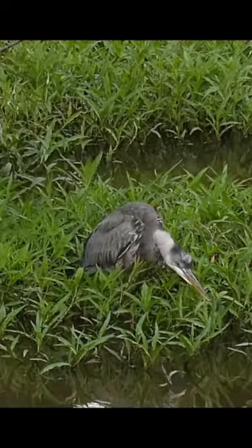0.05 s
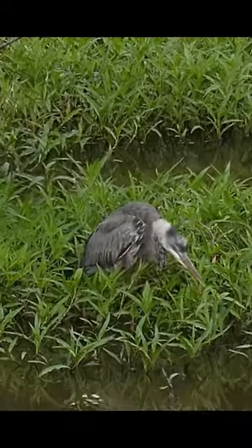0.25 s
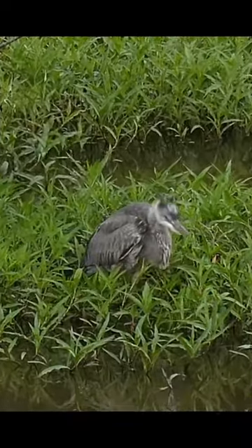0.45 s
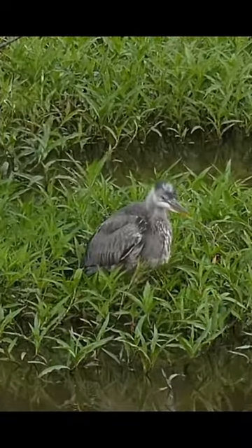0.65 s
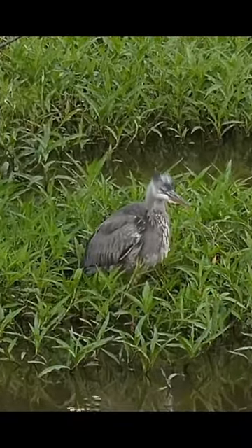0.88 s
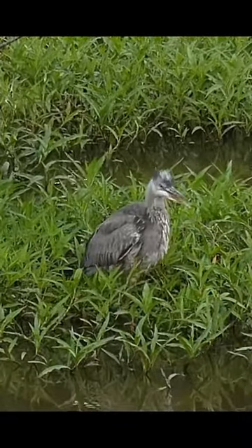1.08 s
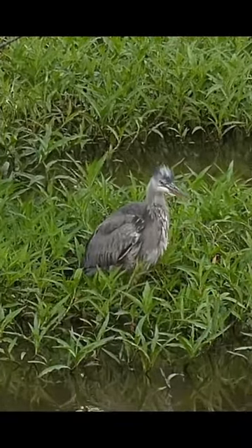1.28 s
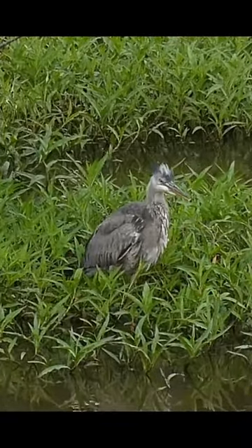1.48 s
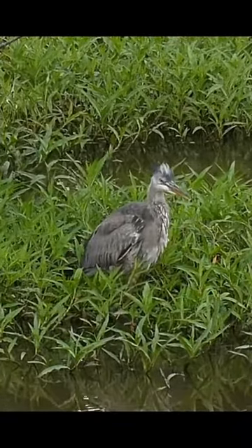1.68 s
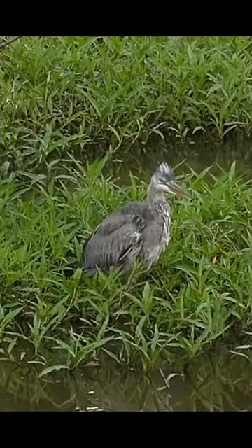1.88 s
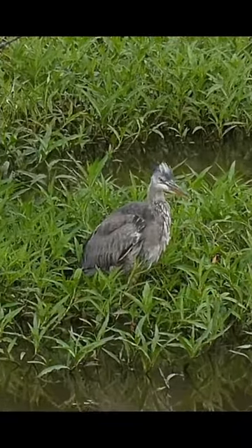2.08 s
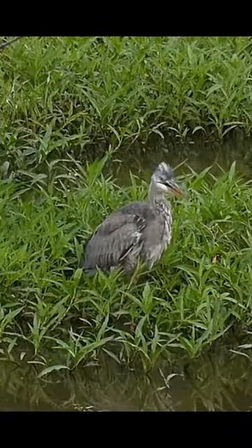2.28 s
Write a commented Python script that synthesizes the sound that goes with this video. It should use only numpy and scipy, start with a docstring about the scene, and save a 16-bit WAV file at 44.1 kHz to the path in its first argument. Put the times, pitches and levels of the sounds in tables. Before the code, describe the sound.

A bird pipes a rapid run of short, high notes over a faint outdoor hush.

```python
"""A faint outdoor wash is heard first, then a bird on a grassy bank pipes nineteen short, arched notes.
The run swells and rises in pitch, then sinks again, over a soft high rustle and a few dull bumps.
Each note is a pulse tone, a harmonic series whose second partial is lifted by throat resonance.
The banks return it as discrete echoes; the foliage scatters it into a diffuse, dying cloud."""
import sys
import numpy as np
from scipy import signal
from scipy.fft import rfft, irfft
from scipy.io import wavfile

SR = 44100
rng = np.random.default_rng(int(sys.argv[2]) if len(sys.argv) > 2 else 0)


def bounce(signal):
    """Save signal as a 16-bit WAV file at the path given by the first command-line argument."""
    frames = np.transpose(np.atleast_2d(signal))
    limited = np.clip(frames, -1, 1)
    pcm = np.round(limited * 32767).astype(np.int16)
    wavfile.write(sys.argv[1], SR, pcm)


N = 108045
T = np.arange(N) / SR


def from_db(db):
    """Amplitude ratio of a level in decibels."""
    return 10 ** (np.asarray(db) / 20)


def unit_rms(x):
    """Normalisation to unit mean power."""
    return x / np.sqrt(np.mean(x ** 2) + 1e-20)


def at_hz(points, hz):
    """Interpolation on a log-frequency axis."""
    f, value = np.transpose(points)
    return np.interp(np.log(np.maximum(hz, 1)), np.log(f), value)


def drift(rate_hz):
    """Random modulation: low-passed noise of unit rms."""
    pole = np.exp(-2 * np.pi * rate_hz / SR)
    noise = rng.standard_normal(N + SR)
    return unit_rms(signal.lfilter([1], [1, -2 * pole, pole * pole], noise)[SR:])


def ramp(x):
    """Raised-cosine step from 0 to 1."""
    return np.sin(np.pi / 2 * np.clip(x, 0, 1)) ** 2


def filtered_noise(edges_hz, kind, shape):
    """White noise limited in bandwidth by a filter."""
    sos = signal.butter(2, edges_hz, kind, fs=SR, output="sos")
    return signal.sosfilt(sos, rng.standard_normal(shape))


def stereo_noise(spectrum, correlation):
    """Coloured noise of unit rms; the ratio of mid to side sets the left-right correlation."""
    hz = np.arange(N // 2 + 1) * SR / N
    mid, side = rfft(rng.standard_normal((2, N))) * from_db(at_hz(spectrum, hz))
    alike = np.clip(correlation(hz), -1, 1)
    return unit_rms(irfft(np.sqrt(1 + alike) * mid + np.sqrt(1 - alike) * side * [[1], [-1]], N))


# Spectrum of the wash. Each row: frequency in Hz, relative spectral density in dB.
WASH_SPECTRUM = [(25, -8), (45, -23), (70, -9), (120, -4.5), (165, -3.5), (230, 5), (310, 4.5), (400, 1.5),
                 (800, 0), (1200, -7), (1600, -10.5), (3000, -16), (4700, -18), (6500, -21), (8000, -24.5),
                 (10000, -21.5), (15000, -29.5)]
# Width of the wash. Each row: frequency in Hz, left-right correlation from -1 to 1.
WASH_CORRELATION = [(40, -0.8), (120, -0.65), (300, -0.79), (700, -0.6), (1300, -0.45), (2500, 0.11),
                    (5000, 0.8), (13000, .3)]
# Faint drone in the wash. Each row: centre frequency in Hz, level in dB.
DRONE_BANDS = [(120, -81), (181, -81.5), (228, -77.5), (304, -72)]

def outdoor_wash(level_db=-53.5, flutter_db=0.77, drone_width_hz=5):
    """Broadband noise with a low drone; random modulation spreads each drone tone into a narrow band."""
    gain = from_db(level_db + flutter_db * drift(8.3))
    air = gain * stereo_noise(WASH_SPECTRUM, lambda hz: at_hz(WASH_CORRELATION, hz))
    for hz, db in DRONE_BANDS:
        phase = 2 * np.pi * hz * T
        band = drift(drone_width_hz) * np.sin(phase) + drift(drone_width_hz) * np.cos(phase)
        air += from_db(db) * band
    return air


# Swell of the rustle. Each row: time in seconds, level in dB.
RUSTLE_ENVELOPE = [(0, -69), (.14, -66.5), (.25, -90), (.48, -73), (.62, -61.5), (.72, -57.5), (.82, -57.5),
                   (.88, -62.5), (.97, -81), (2.45, -100)]
# Spectrum of the rustle. Each row: frequency in Hz, relative spectral density in dB.
RUSTLE_SPECTRUM = [(2000, -10.5), (2750, -4.5), (3400, -13), (3850, -12), (4650, 0), (5000, -4.5),
                   (5450, 1), (6000, -10.5), (7500, -14), (10000, -24), (15000, -40)]

def rustle(grain_db=0.5, correlation=0.79):
    """A soft hiss swells under the early notes; fast amplitude modulation gives it grain."""
    level_db = np.interp(T, *np.transpose(RUSTLE_ENVELOPE)) + grain_db * drift(50)
    return from_db(level_db) * stereo_noise(RUSTLE_SPECTRUM, lambda hz: correlation)


# Dull bumps and brief scuffs. Each row: start, attack, hold and release in seconds,
# low and high band edges in Hz, level before panning in dB.
BUMP_EVENTS = [(0.276, .05, 0.21, 0.11, 460, 930, -66.5), (0.603, .035, 0.051, .06, 55, 100, -64.5),
               (1.575, 0.03, 0.046, 0.046, 207, 337, -66), (2.13, 0.0246, 0.057, 0.071, 60.5, 116, -69),
               (2.133, 0.038, 0.1, 0.044, 189.5, 288, -60.5), (2.125, 0.018, 0.043, 0.12, 2460, 3520, -66),
               (2.117, 0.023, 0.036, .08, 4500, 7500, -71)]

def bumps(right_over_left_db=8, side_gain=0.17):
    """Swells of band-limited noise, placed to the right by a level difference between the ears."""
    out = np.zeros((2, N))
    for start, attack, hold, release, low_hz, high_hz, db in BUMP_EVENTS:
        mid, side = filtered_noise([low_hz, high_hz], "band", (2, N))
        end = start + attack + hold + release
        envelope = ramp((T - start) / attack) * ramp((end - T) / release)
        out += from_db(db) * envelope * unit_rms(mid + side_gain * side * [[1], [-1]])
    return out * from_db([[-right_over_left_db / 2], [right_over_left_db / 2]])


# Echoes off the banks. Each row: delay in seconds, gain in dB.
BANK_ECHOES = [(.011, -46), (.024, -17.5), (.037, -20), (.056, -28.5)]

def banks_and_foliage(sound, scatter_db=-8.5, side_db=-12.5, cutoff_hz=9200,
                      scatter_delay_s=0.012, build_s=0.0032, t60_s=1):
    """Reflection off banks gives echoes; scattering by foliage, a duller, exponentially dying tail."""
    t = np.maximum(T[:SR] - scatter_delay_s, 0)
    mid, side = filtered_noise(cutoff_hz, "low", (2, SR))
    cloud = mid + from_db(side_db) * side * [[1], [-1]]
    envelope = (1 - np.exp(-t / build_s)) * from_db(-60 * t / t60_s)
    response = from_db(scatter_db) * envelope / np.sqrt(np.sum(envelope ** 2)) * cloud
    for delay, db in BANK_ECHOES:
        response[:, int(delay * SR)] += from_db(db)
    return signal.fftconvolve(sound[None], response, axes=1)[:, :N]


NOTE_S = 0.054

def pitch_arch(t, top_hz, waver, top_s=0.02723, reference_hz=2419):
    """Frequency modulation: the fundamental, an octave below the heard pitch, rises and falls."""
    rise = 0.1559 * np.maximum(1 - t / top_s, 0) ** 2
    fall = 0.1 * np.maximum((t - top_s) / (NOTE_S - top_s), 0) ** 1.67
    depth = (top_hz / reference_hz) ** 5.1   # lower notes have flatter arches
    return top_hz / 2 * (1 - (rise + fall) * depth + .003 * waver)


def note_envelope(t, growth_db, onset_s=.0035, attack_s=0.015, release_s=0.022):
    """Amplitude envelope: a two-stage attack, a slope in level with a brief dip, a smooth release."""
    attack = .36 * ramp(t / onset_s) + .64 * ramp(t / attack_s)
    slope_db = growth_db * (t / NOTE_S - .5)
    dip_db = -5 * np.exp(-((t - .021) / .0065) ** 2)
    return attack * ramp((NOTE_S - t) / release_s) * from_db(slope_db + dip_db)


# Frequency response of the throat. Each row: frequency in Hz, gain in dB.
THROAT_RESPONSE = [(1000, -46), (1220, -32), (1700, -20), (2050, 1.5), (2150, -0.5), (2270, 1), (2450, 0),
                   (2900, -18), (3400, -27.5), (3680, -56), (4350, -19), (4600, -32.5), (4850, -20),
                   (5400, -41), (5800, -43), (6060, -35.5), (6500, -64), (7250, -45), (8500, -50),
                   (10000, -52)]

def throat_tone(t, fundamental_hz, even_db, odd_db, rasp, flicker_db, rasp_rad=0.24):
    """Source and filter: harmonics sweep through resonances; the second is clean, the rest rough."""
    phase = 2 * np.pi * np.cumsum(fundamental_hz) / SR
    tone = from_db(at_hz(THROAT_RESPONSE, 2 * fundamental_hz)) * np.sin(2 * phase)
    bloom_db = 6 * np.exp(-((t - 0.022) / 0.011) ** 2)   # weak partials swell near the top of the arch
    for k, (wobble, swing_db) in enumerate(zip(rasp, flicker_db), 1):
        if k != 2:
            throat_db = at_hz(THROAT_RESPONSE, k * fundamental_hz)
            gain = from_db(throat_db + (odd_db if k % 2 else even_db) + bloom_db + swing_db)
            jitter = rasp_rad * (k / len(rasp)) ** 2 * wobble
            tone += gain * np.sin(k * phase + jitter)
    return tone


# The run of notes. Each row: start in seconds, top frequency of the second partial in Hz, then in dB
# the level, the offset of even partials above the second, that of odd partials, growth over the note.
BIRD_NOTES = [(.197, 2220, -44.5, -8, -9, -2), (.313, 2235, -41.5, -21, -15, 8),
              (.425, 2296, -42.5, -28, -2, -9.5), (.535, 2320, -41.5, -3, 3, -9),
              (.644, 2330, -41.5, -9, 4, -11.5), (.750, 2370, -41, 5, 0, -14), (.859, 2382, -43, -1, 5, -8),
              (0.964, 2450, -39, -2, 7, -1), (1.072, 2430, -34, -1.5, 0.5, -3),
              (1.175, 2445, -33, 1.5, 2.5, -1), (1.28, 2445, -31, 2, -0.5, 3.5),
              (1.39, 2445, -30, -0.5, -2, -2), (1.495, 2420, -31, 0, -2, -0.5),
              (1.604, 2422, -31.5, 0.5, -1, -2), (1.712, 2424, -31.5, 3.5, -2, 2),
              (1.820, 2432, -32, -6, 1.5, 5), (1.928, 2430, -36, -2.5, 6.5, -3),
              (2.041, 2395, -39, 6.5, 5.5, -5.5), (2.158, 2352, -41, -3, 8.5, -7)]

def bird(partials=8, hoarse_db=-35, hoarse_band_hz=(4800, 7400), left_over_right_db=2.5, lag_s=.000011):
    """Piping notes and their reflections; interaural level and time differences set the bird left."""
    direct, outgoing = np.zeros((2, N))
    waver, shimmer = drift(120), from_db(.5 * drift(120))
    rasp = np.array([drift(160) for _ in range(partials)])
    flicker_db = np.array([drift(11.7) for _ in range(partials)])
    air = unit_rms(filtered_noise(hoarse_band_hz, "band", N))
    for start, top_hz, db, even_db, odd_db, growth_db in BIRD_NOTES:
        span = (T >= start) & (T < start + NOTE_S)
        t = T[span] - start
        fundamental_hz = pitch_arch(t, top_hz, waver[span])
        tone = throat_tone(t, fundamental_hz, even_db, odd_db, rasp[:, span], flicker_db[:, span])
        airy_edge = from_db(hoarse_db + odd_db) * air[span]
        note = (tone + airy_edge) * note_envelope(t, growth_db) * shimmer[span]
        direct[span] += from_db(db) * note
        outgoing[span] += from_db(-35 + .6 * (db + 35)) * note   # reflections vary less in level
    left = direct * from_db(left_over_right_db / 2)
    right = np.interp(T - lag_s, T, direct) * from_db(-left_over_right_db / 2)
    return np.array([left, right]) + banks_and_foliage(outgoing)


def scene():
    """Superposition of the bird and its background."""
    return bird() + outdoor_wash() + rustle() + bumps()


def record(dry, cutoff_hz=15500):
    """Band limiting: a steep low-pass filter removes the highest treble."""
    return signal.sosfilt(signal.ellip(12, .1, 80, cutoff_hz, fs=SR, output="sos"), dry)


dry = scene()
out = record(dry)
bounce(out)
```